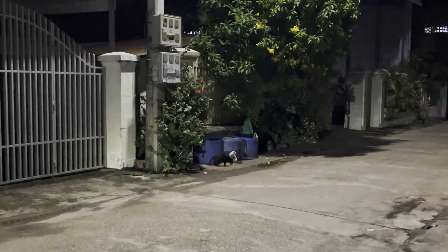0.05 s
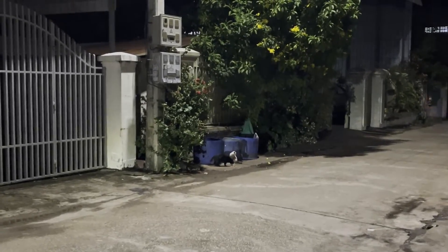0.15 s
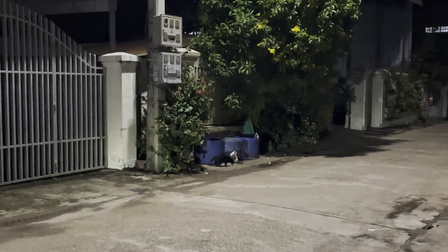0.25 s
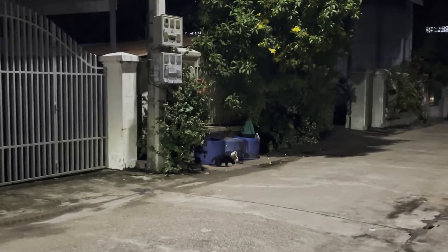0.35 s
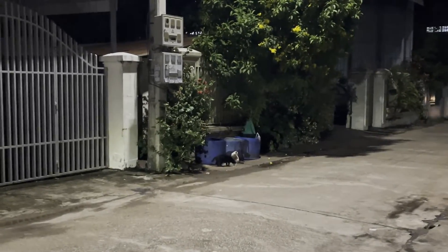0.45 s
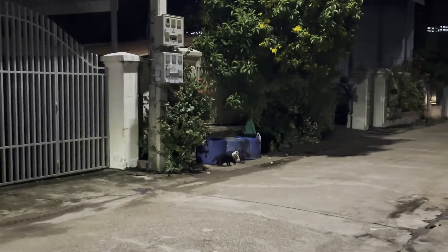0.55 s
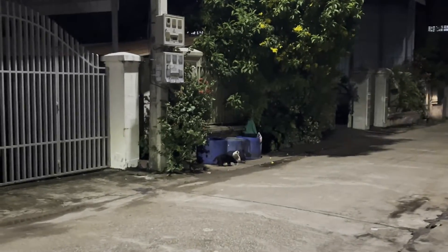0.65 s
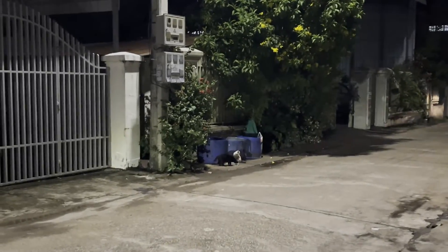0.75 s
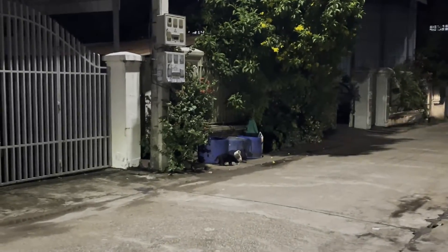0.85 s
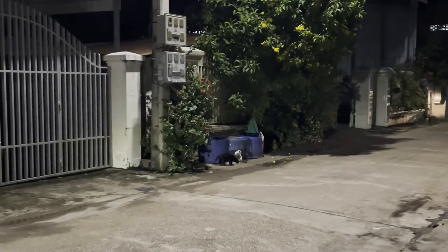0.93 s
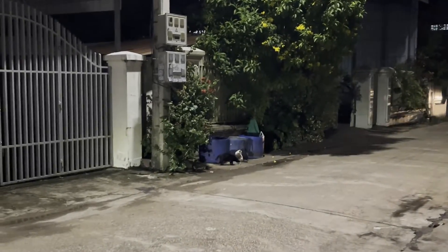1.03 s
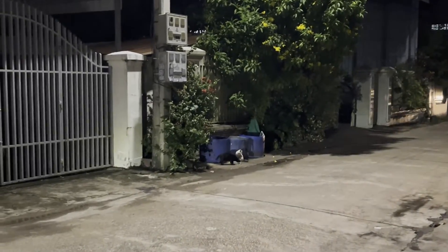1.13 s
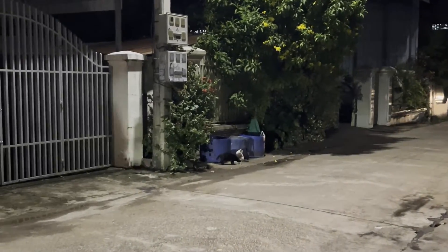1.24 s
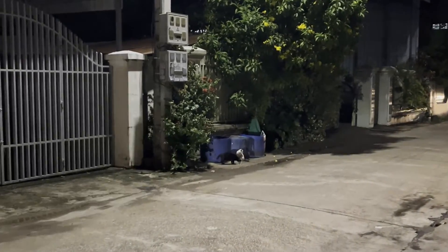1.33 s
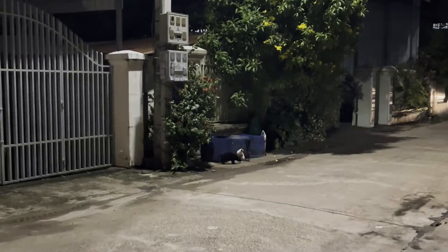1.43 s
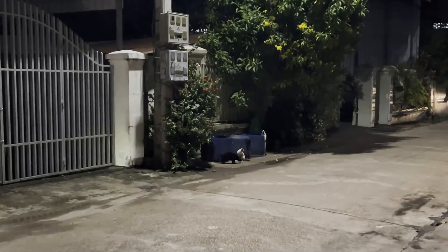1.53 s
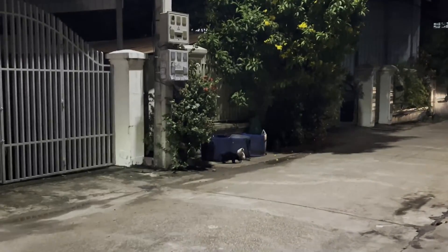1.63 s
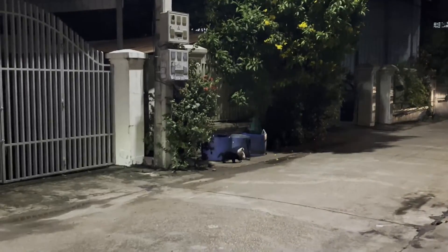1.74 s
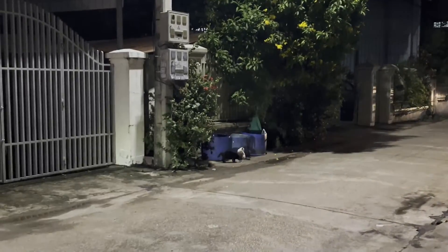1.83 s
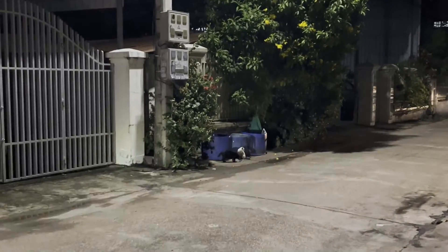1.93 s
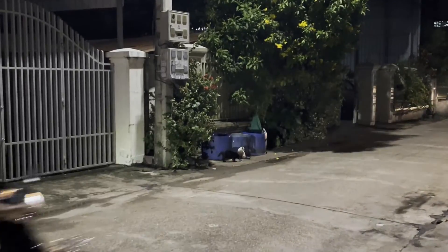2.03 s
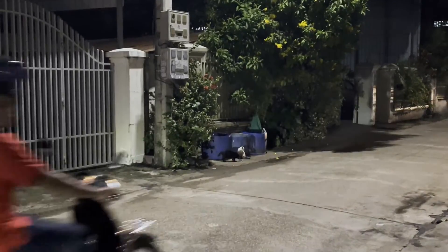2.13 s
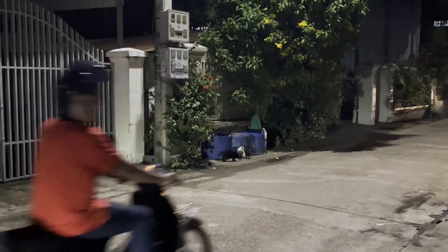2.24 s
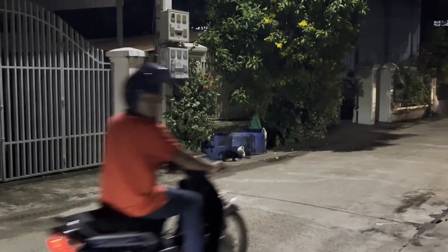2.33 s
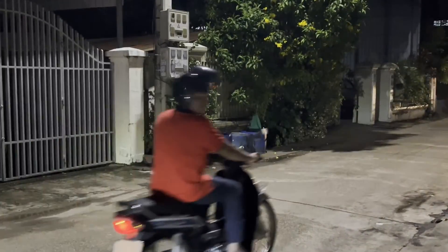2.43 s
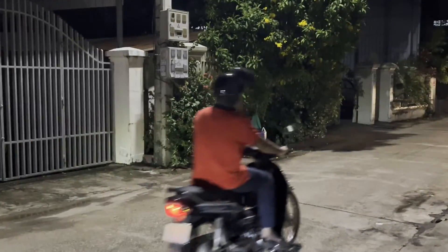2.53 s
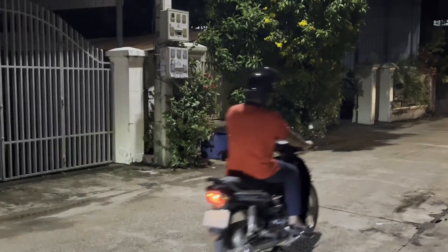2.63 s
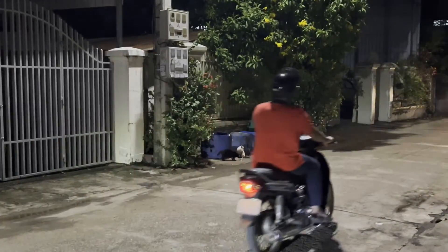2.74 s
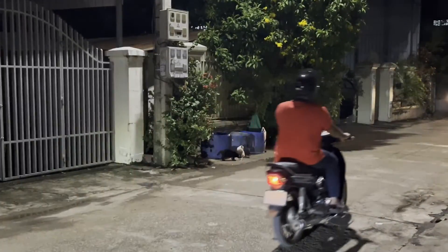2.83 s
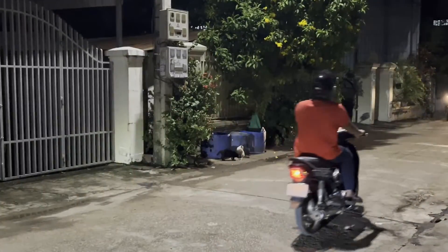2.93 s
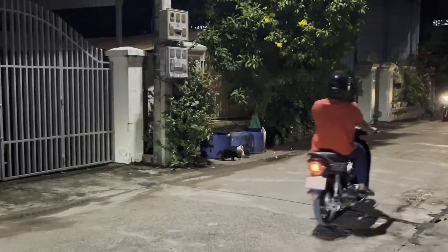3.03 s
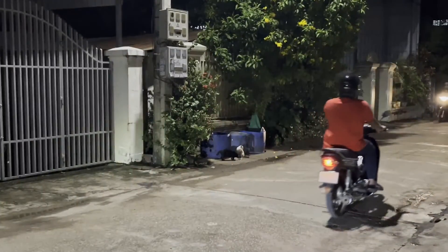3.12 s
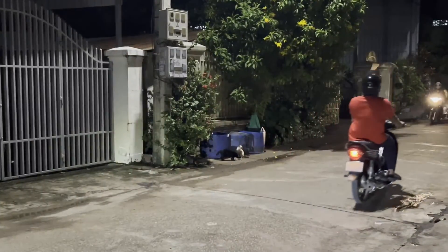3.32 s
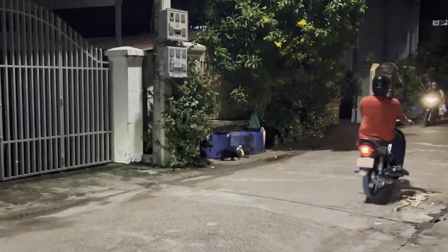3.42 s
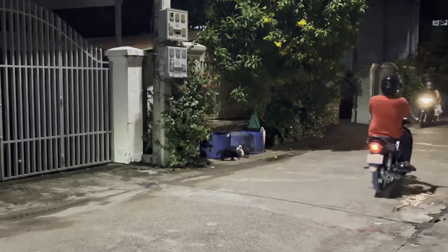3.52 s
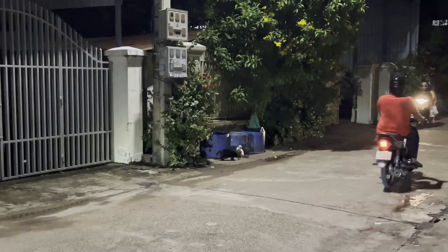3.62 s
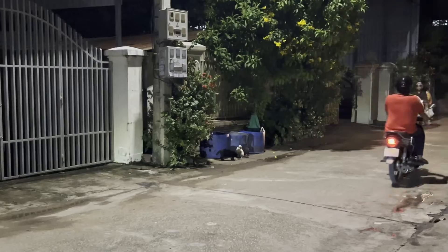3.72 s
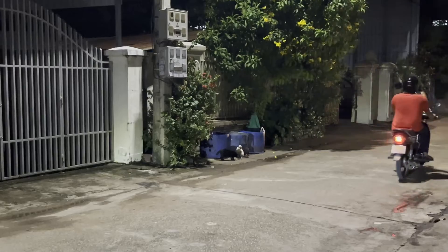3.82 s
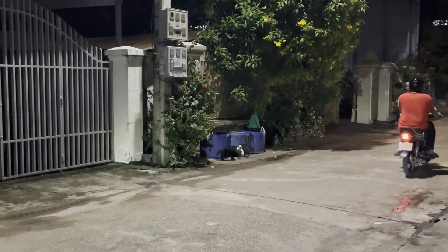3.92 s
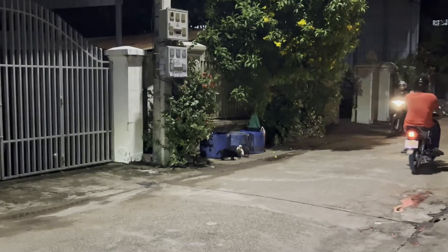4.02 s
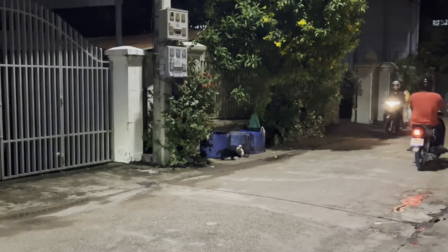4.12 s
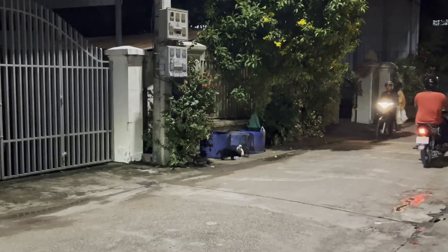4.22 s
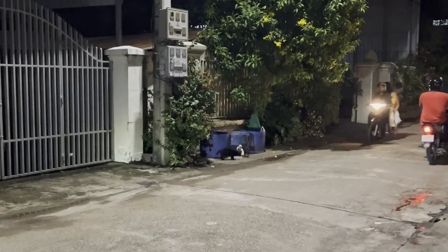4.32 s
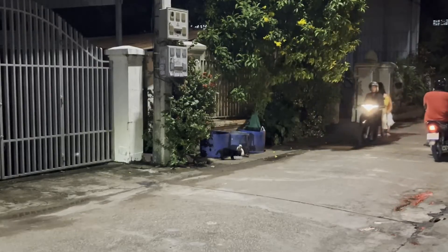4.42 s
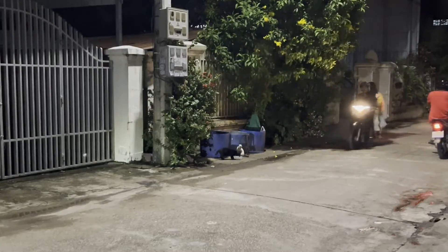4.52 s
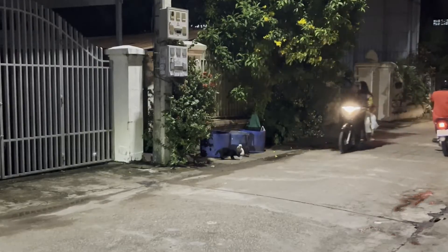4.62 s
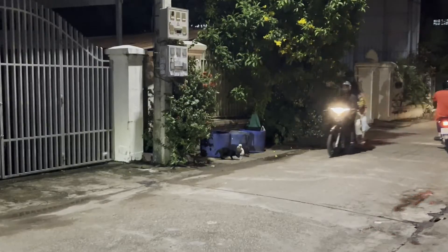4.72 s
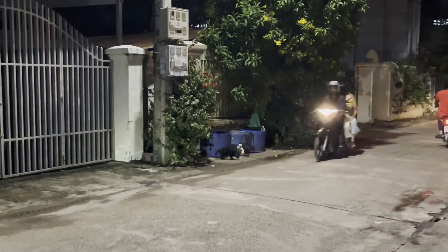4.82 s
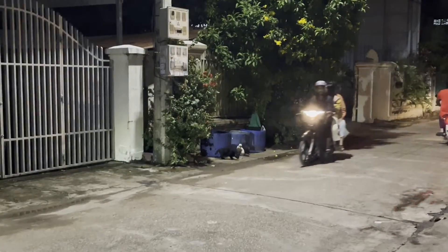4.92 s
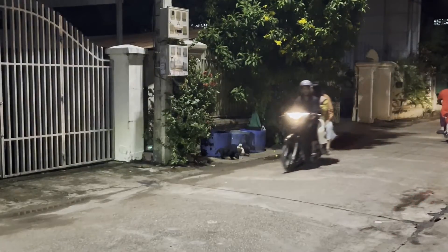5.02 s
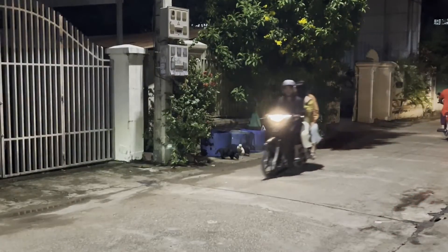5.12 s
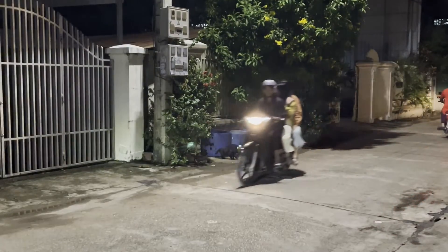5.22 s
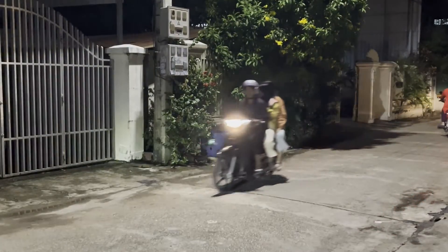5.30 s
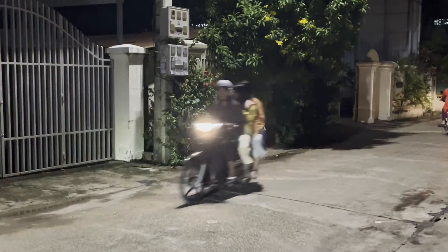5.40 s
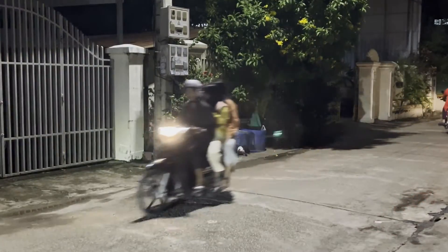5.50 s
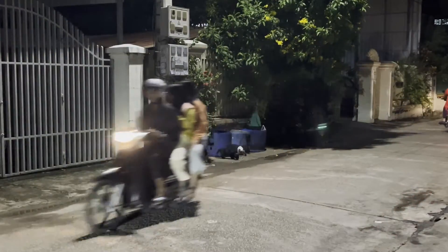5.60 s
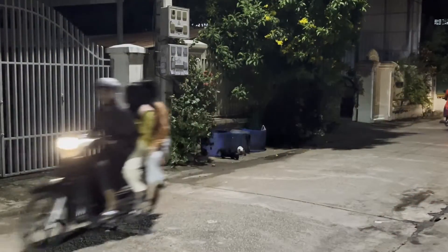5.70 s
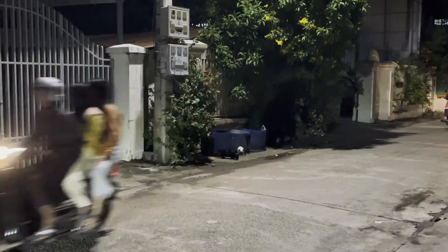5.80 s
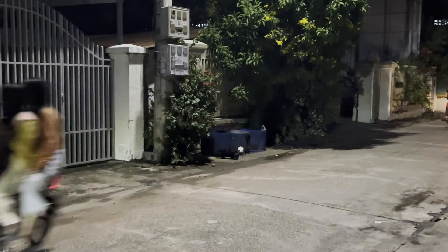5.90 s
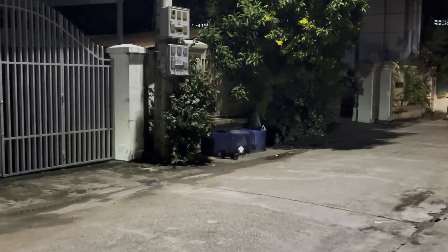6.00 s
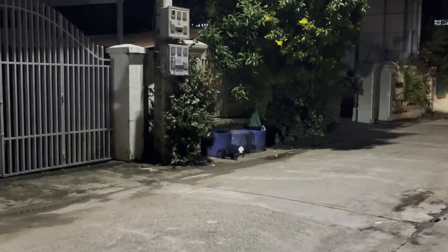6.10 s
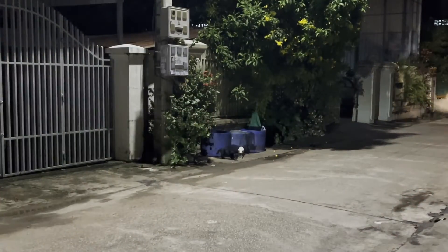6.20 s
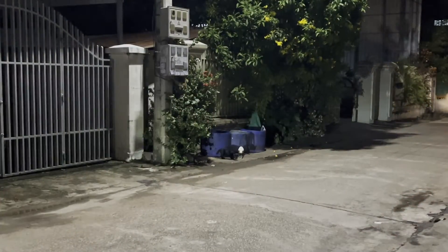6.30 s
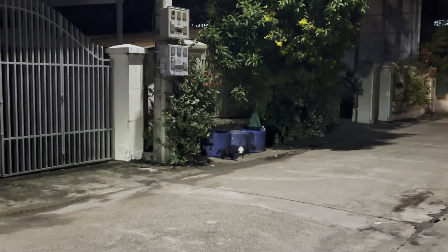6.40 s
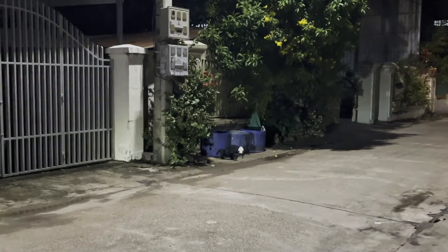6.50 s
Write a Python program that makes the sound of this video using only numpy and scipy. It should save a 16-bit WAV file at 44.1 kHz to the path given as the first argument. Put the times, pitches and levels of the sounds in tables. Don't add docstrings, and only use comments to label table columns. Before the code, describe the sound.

In a quiet walled lane at night, one small motorbike putters past and accelerates off, then another approaches and passes with rattling metal.

```python
import sys
import numpy as np
from scipy import signal
from scipy.fft import rfft, irfft, next_fast_len
from scipy.io import wavfile
from scipy.ndimage import uniform_filter1d

SR = 44100
rng = np.random.default_rng(int(sys.argv[2]) if len(sys.argv) > 2 else 0)


def file_out(sig):
    cols = np.atleast_2d(sig).T
    lim = np.clip(cols, -1, 1)
    pcm = np.round(lim * 32767).astype(np.int16)
    wavfile.write(sys.argv[1], SR, pcm)


def voltage_ratio(decibels):
    exponent = np.asarray(decibels, float) / 20
    return 10 ** exponent


N = 288855
T = np.arange(N) / SR
FAST = next_fast_len(N)
HZ = np.maximum(np.fft.rfftfreq(FAST, 1 / SR), 1)

# t/s, f/Hz
FIRING_RATE_1 = [(0, 21.88), (0.3, 21.42), (0.6, 20.25), (0.9, 18.49), (1.5, 16.19), (2.1, 13.54),
                 (2.7, 12.19), (3, 11.53), (3.3, 10.48), (3.55, 9.14), (3.7, 13.05), (3.85, 16.72),
                 (4, 16.12), (4.15, 17.5), (4.3, 19.56), (4.5, 20.55), (4.85, 21.1), (5, 21.2),
                 (5.34, 21.1)]
FIRING_RATE_2 = [(0, 20.3), (1.5, 20.5), (2.5, 20.9), (3.3, 20.6), (4, 20.9), (4.9, 20.7), (5.5, 20.8),
                 (5.8, 21), (6.1, 20.75), (6.3, 20.45), (6.55, 20.05)]
FIRING_1_S, FIRING_2_S = 2.277, 6.191
# t/s, thump level/dB, throttle/1, wall echo level/dB
EXHAUST_1 = [(0, -57.5, 0.16, 1.5), (.45, -52.5, 0.29, -4.5), (.85, -55.5, 0.03, -8.5),
             (1.05, -50, 0.18, -7.5), (1.12, -57.5, 0.11, -5), (1.18, -52, 0.14, -5),
             (1.29, -48.5, 0.2, -12), (1.4, -52.5, 0.25, -6), (1.498, -48, 0.19, -7.5),
             (1.58, -48.5, 0.2, -6), (1.65, -52.5, 0.08, -7), (1.715, -43.5, 0.26, -8),
             (1.79, -47.5, 0.25, -7.5), (1.86, -48.5, 0.35, 2.5), (1.923, -43.5, 0.33, -12),
             (2.05, -51, 0, 0), (2.14, -42.5, 0.28, -13), (2.35, -39, 0.1, -6.5), (2.52, -43.5, .2, -10),
             (2.6, -43, 0.24, -3), (2.68, -44, 0.26, 1), (2.77, -42, 0.35, -3.5), (2.92, -50.5, 0.5, 2),
             (3.02, -48, 0.52, -2), (3.11, -44, 0.47, -3.5), (3.2, -43, 0.57, -5), (3.3, -48.5, 0.29, -4),
             (3.39, -46, 0.44, -1.5), (3.5, -56, 0.46, -5), (3.7, -44, 0.37, -7.5), (4.031, -48, 0.41, -2),
             (4.18, -36, 0.75, -11), (4.24, -45, 0.72, -3.5), (4.4, -41.5, 0.74, -14.5),
             (4.6, -46.5, 0.75, -3.5), (4.8, -52, 0.99, 5), (5, -41.5, 0.78, -0.5),
             (5.17, -43.5, 0.77, -2.5), (5.35, -43, 0.96, 0), (5.9, -72, 0.3, -3)]
EXHAUST_2 = [(0, -56, 0.38, -5), (1.5, -65, 0.98, -9), (2.5, -57, 0.46, 1), (3.7, -51.5, 0.47, 5.5),
             (4.3, -56, 0.41, 7), (4.7, -50, 0.63, 11.5), (4.978, -48, 0.55, -7), (5.2, -48, 0.56, -13),
             (5.36, -49, 0.48, 4.5), (5.43, -37.5, 0.9, -6.5), (5.48, -35, 1, -3), (5.6, -36, 1, -7),
             (5.75, -35, 0.74, -4), (5.9, -38, 0.43, -2), (6.051, -38.5, 0.59, 2), (6.2, -35, 0.66, -8),
             (6.3, -34, 0.49, -13), (6.4, -33, 0.53, -30), (6.55, -35, 0.83, 2)]
# f/Hz, width/Hz
PIPE_1 = [
    (87.7, 48),
    (57.3, 30.4),
    (178.8, 72.7),
    (232, 90),
    (112.15, 54.2),
]
PIPE_2 = [
    (84.7, 28),
    (43, 8.2),
    (155.4, 74),
    (250.6, 103),
    (113.24, 41),
]
# delay/s (replaced by the nearest-wall delay in row one), level/dB, drift/s, extra lag on the right/s
WALLS_1 = [(0, -1.5, 0.00024, .00015), (.024, -3.5, 0.0016, -.0002), (0.036, -6, 0.006, .0003),
           (0.051, -13, 0.0026, -.0004), (0.08, -10.5, 0.013, .0004)]
WALLS_2 = [(0, -1.5, 0.00021, .00015), (0.017, -5.5, 0.002, -.0002), (0.031, -4.5, 0.0027, .0003),
           (.052, -18.5, 0.0047, -.0004), (0.082, -17.5, 0.0046, .0004)]
# t/s, delay/ms
NEAR_WALL_1 = [(0, 7), (.4, 9.6), (.8, 9.2), (1.2, 7.3), (1.6, 9.4), (2, 8.1), (2.4, 8.4), (2.8, 12.5),
               (3.2, 8.74), (3.6, 10.4), (4, 8.3), (4.3, 12.3), (4.54, 13.4), (4.8, 11.24), (5, 9.07),
               (5.17, 13.9), (5.39, 12.2)]
NEAR_WALL_2 = [(0, 12), (3, 8.55), (4, 10.3), (5, 10.6), (5.39, 10.6), (5.52, 9.4), (5.7, 11.2),
               (5.86, 11.6), (6.06, 8.2), (6.2, 10.6), (6.31, 13), (6.4, 5.9), (6.55, 8.5)]
# (level/dB at closed throttle, dB added at full throttle); loaded share likewise/1
BOOM_1, BARK_1, UPPER_1, LOADED_1 = (13, -38), (-12.5, 8.8), (-22, 9.3), (0.17, 0.7)
BOOM_2, BARK_2, UPPER_2, LOADED_2 = (3, -34), (-2, -13), (-8.5, -12), (0.23, 0.73)
# t/s, share/1
FRONT_1 = [(0, 0.076), (.8, 0.28), (1.6, 0.52), (2.78, 0.67), (2.9, 0.016), (3.5, -0.21), (4.2, -0.23),
           (4.45, 0.01)]
FRONT_BOOM_DB, FRONT_BARK_DB, FRONT_ECHO_DB = 4.5, 11.5, -7.5
# t/s, shift/ms
PUFF_SHIFT_1 = [(0, 3.5), (2.78, 4), (2.84, -5), (2.92, 4.5), (3.09, 0.5), (3.19, -4.5), (3.28, -3.5),
                (3.58, -5), (3.75, -4), (3.81, 3), (4, 3), (4.18, -3), (4.45, -2.5), (4.53, 3.5)]
LOPE_DB, LOPE_HZ, LOPE_WIDTH_HZ, WEAK_LATE_S = 6.5, 12.8, 0.95, 0.0032
FULL_DB, FULL_BOOM_DB = 3, -3.5

# t/s, r/m
DISTANCE_1 = [(0, 21), (.37, 12), (.6, 6.8), (1.07, 5.75), (1.54, 3.7), (1.9, 2.3), (2.1, 1.48),
              (2.32, 2.13), (2.55, 2.86), (2.95, 3.76), (3.4, 9.2), (4.5, 35), (6.55, 9.5)]
DISTANCE_2 = [(0, 36), (3, 7), (3.6, 12.6), (4.18, 9.7), (4.44, 7.1), (4.83, 6.1), (5.27, 5.04),
              (5.55, 3.66), (5.9, 2.2), (6.15, 2.28), (6.35, 2.45), (6.55, 2.84)]
REFERENCE_M = 2.5
ROLL_HZ = [600, 2000, 5200, 11500]
# level/dB at the reference distance, and steepness of the fade with distance/1
ROLL_1, ROLL_FADE_1 = [-57, -58, -72.5, -75], [0.6, 0.75, 0.77, 1.422]
ROLL_2, ROLL_FADE_2 = [-53.5, -52.5, -62.5, -69], [0.7, 1.047, 0.79, 1.15]
# from t/s, to t/s, change/dB
SHADE_1, SHADE_2 = (1.92, 2.1, -5), (6, 5.85, -1.4)
# f/Hz, level per Hz/dB
HISS_1 = [(150, 3.5), (230, 8), (300, -8), (400, 3), (560, 2), (800, 1.5), (1200, -2), (1500, 2.5),
          (1900, -1), (2600, -4.5), (3300, -6), (3700, -11.5), (7000, -9), (14500, -4)]
HISS_2 = [(150, 11.5), (300, 1), (450, 1), (660, -2.5), (850, 2), (1200, 0), (1500, 2), (2250, -3.5),
          (2650, -5.5), (3300, -9.5), (3700, -17.5), (5800, -16.5), (7000, -12.5), (14500, -10.5)]
# f/Hz, width/Hz, level/dB
CASE_1 = [(560, 99, 1), (1800, 260, 2.5), (302, 46, 4)]
CASE_2 = [(693, 74, 10), (1710, 1700, 0.87), (5640, 520, 4.4)]

# t/s, level/dB, ring f/Hz, t60/s, crack level/dB
RATTLES = [(.617, -41, 887, 0.058, -60), (1.636, -68, 3000, 0.042, -69), (1.928, -39, 2750, 0.034, -49),
           (1.932, -56, 4750, .05, -70), (2.014, -50, 4840, 0.05, -55.5), (2.053, -43, 4510, 0.045, -52.5),
           (2.186, -63, 13100, 0.024, -69), (2.276, -45.5, 2626, 0.073, -54),
           (2.383, -49.5, 4380, 0.077, -54.5), (2.39, -55, 6140, 0.053, -69),
           (2.419, -50, 4130, 0.087, -55.5), (2.426, -49.5, 6120, 0.089, -63),
           (2.6, -61, 5200, 0.021, -59.5), (2.76, -65.5, 4970, 0.043, -59), (2.947, -51, 5360, 0.025, -65),
           (4.703, -61, 3940, 0.033, -61), (5.675, -37, 1010, 0.066, -46.5), (5.894, -41, 1730, 0.092, -70),
           (5.95, -19, 647, 0.055, -69), (6.155, -41.5, 2010, 0.073, -70), (6.203, -47.5, 1990, 0.18, -66),
           (6.439, -45.5, 1820, 0.14, -72), (.655, -55, 870, 0.11, -70), (2.022, -48, 4770, 0.04, -62),
           (2.05, -54, 10500, .04, -73), (2.376, -55, 10600, 0.039, -66), (2.415, -51, 3250, 0.073, -64),
           (5.95, -42.5, 1745, 0.26, -70), (6.13, -38, 686, .08, -70), (6.243, -42, 1990, 0.098, -68),
           (6.31, -35, 650, 0.079, -66), (6.445, -39, 1440, 0.16, -75), (5.865, -36.5, 591, 0.13, -68),
           (6.33, -43, 393, 0.28, -72), (6.44, -37, 560, 0.097, -70), (6.465, -41.5, 470, 0.18, -67),
           (6.49, -41, 606, 0.11, -65), (6.245, -51, 3440, 0.092, -72), (5.675, -42, 687, 0.056, -68),
           (6.275, -60, 1800, 0.07, -72)]
RING_SAG, RING_CLEAN = 0.636, 0.7
# t/s, level/dB
TICKS = [(1.158, -69), (1.389, -73), (1.453, -66), (1.516, -64), (1.581, -65), (1.635, -64), (1.707, -55),
         (1.774, -58), (1.8266, -62), (1.845, -59), (1.884, -63), (1.908, -55), (1.982, -55), (2.053, -58),
         (2.129, -54), (2.1858, -56), (2.209, -60), (2.2786, -56), (2.379, -63), (2.428, -59), (2.482, -57),
         (2.5151, -66), (2.59, -61), (2.757, -64), (2.878, -65), (3.771, -66), (3.1115, -60), (5.921, -57),
         (6.234, -52)]
# t/s, level/dB, attack/s, delay of the second snap/s, its relative level/dB
CLACKS = [
    (3.107, -49.5, 0.0048, 0.019, 0),
    (3.637, -58, 0.003, .008, -4),
]
# f/Hz, level/dB
CLACK_COLOUR = [(500, 5), (1300, 7.5), (2500, 1), (4000, 0), (5500, 3), (7500, 0), (10000, -9.5),
                (14000, -14), (15000, -24)]
# f/Hz, level/dB
CLACK_MODES = [
    [(1780, -13), (2550, 5.5), (3850, -9), (5330, -7), (6800, -14), (10100, 1.5)],
    [(3030, 7), (3910, -7), (4610, 9.5), (5940, 4), (6600, -1), (10100, -3)],
]

# f/Hz, level per Hz/dB
NIGHT = [(120, -57), (200, -47), (302, -4.5), (432, -30.5), (1040, -24), (1160, -29), (2420, -35.5),
         (14500, -47.5)]
NIGHT_DB, NIGHT_FADE_DB, NIGHT_FADES_S = -65, -8, (0.36, 0.92)

# t/s, left minus right level/dB
PAN = [(0, 1.6), (1.2, 2.4), (2, 0.5), (2.7, 1.5), (3.7, 1.9), (4.7, 2), (5.2, 1.7), (5.7, 1), (6.3, 1.2)]
# f/Hz, likeness/1
LIKENESS = [(150, 0.96), (300, 0.55), (550, 0.84), (900, 0.3), (1250, 0.43), (1500, 0.67), (2000, 0.91),
            (4000, 1), (8500, .97), (14500, 0.71)]
# f/Hz, left minus right level/dB
BALANCE_DB = [(60, -1.36), (200, -1), (300, -2), (500, 3.5), (700, 1.5), (1000, 1), (1500, -6),
              (2000, -4.5), (2500, -2), (3200, 0), (15000, 0)]
# f/Hz, lead of the left/rad
LEAD = [(0, 0), (1100, .1), (1500, 3), (1650, 3), (1720, .3), (3200, .5), (4500, 0), (6000, -.95),
        (7000, -1.5), (8500, -3.14), (9500, -4.25), (12000, -6.28), (13500, -7.6), (15500, -9.7)]
# f/Hz, level/dB
PORT = [(7000, 0), (9300, 2), (10200, 4), (11000, -3), (14000, -4.5), (14800, -1), (15300, -15)]


def curves(rows):
    s, *columns = np.transpose(rows)
    return [np.interp(T, s, c) for c in columns]


def on_hz(rows):
    hz, value = np.transpose(rows)
    return np.interp(np.log(HZ), np.log(hz), value)


def unit(x):
    return x / np.sqrt(np.mean(x ** 2))


def ring(x, hz, width):
    return signal.lfilter(*signal.iirpeak(hz, hz / width, SR), x)


def walk(rate):
    k = int(SR / rate)
    held = np.repeat(rng.standard_normal(N // k + 1), k)
    return 1.241 * uniform_filter1d(uniform_filter1d(held, k), k)[:N]


def diffuse_noise(gain):
    like = np.clip(on_hz(LIKENESS), 0, 1)
    same, other = rfft(rng.standard_normal((2, N)), FAST) * gain
    pair = np.sqrt(1 + like) * same + np.sqrt(1 - like) * other * np.array([[1], [-1]])
    return pair, same


def lane(x, t60_s, db):
    t = T[:SR // 2]
    same, other = rng.standard_normal((2, len(t))) * voltage_ratio(-60 * t / t60_s)
    tail = np.array([same + 0.16 * other, same - 0.27 * other])
    tail = tail / np.sqrt(np.sum(same ** 2))
    return x + voltage_ratio(db) * signal.fftconvolve(x[None], tail, axes=1)[:, :N]


def cycles(revs, known_s):
    count = np.cumsum(curves(revs)[0]) / SR
    return count - np.interp(known_s, T, count)


def exhaust(count, rows, pipe, walls, near_wall, boom_rule, bark_rule, upper_rule, loaded_rule,
            front, lead_s, polarity, jitter_s, scatter_db):
    thump_db, throttle, echo_db = curves(rows)
    boom_db, bark_db, upper_db = (thump_db + shut + opened * throttle
                                  for shut, opened in (boom_rule, bark_rule, upper_rule))
    boom_db = boom_db + FRONT_BOOM_DB * front
    bark_db = bark_db + FRONT_BARK_DB * front
    echo_db = echo_db + FRONT_ECHO_DB * front

    number = np.arange(np.ceil(count[0]), count[-1])
    time_chance, size_chance = rng.standard_normal((len(number), 2)).T
    when = np.interp(number, count, T - lead_s) + jitter_s * time_chance
    near_idle = np.exp(-((np.gradient(count) * SR - LOPE_HZ) / LOPE_WIDTH_HZ) ** 4)
    lope = np.interp(when, T, near_idle * np.clip(2 * front, 0, 1))
    weak, full = lope * (number % 2), lope * (1 - number % 2)
    when = when + WEAK_LATE_S * weak
    size = voltage_ratio(scatter_db * size_chance - LOPE_DB * weak)

    puffs = np.zeros((3, N))
    direct = np.clip((when * SR).astype(int), 0, N - 1)
    puffs[:2, direct] = size * (1 - full)
    puffs[2, direct] = size * full
    nearest = np.interp(when, *np.transpose(near_wall)) / 1000
    for k, (delay, db, drift, lag) in enumerate(walls):
        late = when + (delay if k else nearest) + drift * np.interp(when, T, walk(0.716))
        echo = size * voltage_ratio(db + np.interp(when, T, echo_db))
        for side in range(2):
            at = np.clip(((late + side * lag) * SR).astype(int), 0, N - 1)
            np.add.at(puffs[side], at, echo)

    modes = []
    for hz, width in pipe:
        rung = ring(ring(ring(puffs, hz, width), hz, 1.02 * width), hz, 1.39 * width)
        modes.append(rung / np.sqrt(np.mean(rung[:2] ** 2)))
    idle, boom, bark, upper, loaded = modes
    share = np.clip(loaded_rule[0] + loaded_rule[1] * throttle + front, 0, 1)
    thump = (1 - share) * idle[:2] + share * loaded[:2]
    thump = thump + voltage_ratio(FULL_DB) * idle[2] - voltage_ratio(FULL_BOOM_DB) * boom[2]
    deep = voltage_ratio(thump_db + 4.5) * thump - voltage_ratio(boom_db) * boom[:2]
    return polarity * (deep + voltage_ratio(upper_db) * upper[:2]) - voltage_ratio(bark_db) * bark[:2]


def loss(distance):
    return 20 * np.log10(np.maximum(curves(distance)[0], 1) / REFERENCE_M)


def rolling(count, loss_db, near_db, steepness, colour, case, fade, shade, tick_db, puff_db, flicker_db):
    levels = np.array(near_db)[:, None] - np.outer(steepness, loss_db)
    levels[:2] += np.interp(T, shade[:2], (0, shade[2])) * np.array([[.4], [1]])
    case_db = sum(db / (1 + (2 * (HZ - hz) / width) ** 2) for hz, width, db in case)
    pair, same = diffuse_noise(voltage_ratio(on_hz(colour) + case_db))

    phase, swell, out = count % 1, walk(4.3), 0
    puff = np.exp(-((phase - .2) / 0.047) ** 2)
    carry_db = .8 * (levels[3] - levels[3].max())
    tick = np.exp(-phase / 0.08) * voltage_ratio(2.5 * walk(12) + carry_db)

    edges = [350, 1100, 3500, 8500, 15000]  # Hz, limits of the four ranges
    scale = [np.sqrt(2 * np.sum(np.abs(same[(HZ > a) & (HZ < b)]) ** 2) * 2) / N
             for a, b in zip(edges, edges[1:])]
    levels = levels - 20 * np.log10(scale)[:, None]
    for k in range(-7, 14):
        hz = 700 * 2 ** (k / 3)
        mask = np.cos(np.pi / 2 * np.clip(3 * np.log2(HZ / hz), -1, 1))
        place = np.interp(np.log(hz), np.log(ROLL_HZ), np.arange(4))
        low = min(int(place), 2)
        db = levels[low] + (place - low) * (levels[low + 1] - levels[low])
        beat = 1 + voltage_ratio(puff_db) * puff + voltage_ratio(tick_db) * tick * min(hz / 10000, 1) ** 2
        band = irfft(pair * mask, FAST)[:, :N]
        out = out + band * voltage_ratio(db + 0.5 * swell + flicker_db * walk(9)) * beat
    return out * fade


def rattles():
    out, t = np.zeros(N), T[:SR // 4]
    for s, db, hz, t60, crack_db in RATTLES:
        noise = rng.standard_normal((2, len(t))) * np.minimum(t / 0.00055, 1)
        tone = np.sin(2 * np.pi * hz * t * (1 - RING_SAG * t))
        shake = RING_CLEAN * tone + 0.42 * unit(ring(noise[0], hz, 0.018 * hz))
        shake = shake * np.minimum(t * hz / 12, 1) * voltage_ratio(db - 60 * t / t60)
        crack = unit(ring(noise[1], 0.48 * hz, 0.55 * hz)) * voltage_ratio(crack_db - 60 * t / 0.11)
        piece = out[int(s * SR):int(s * SR) + len(t)]
        piece += (shake + crack)[:len(piece)]
    return lane(out, 0.33, -9.0)


def ticks():
    out, t = np.zeros(N), T[:SR // 50]
    for s, db in TICKS:
        tick = unit(ring(rng.standard_normal(len(t)), 12200, 3000))
        out[int(s * SR):int(s * SR) + len(t)] += tick * voltage_ratio(db - 60 * t / 0.021)
    return lane(out, 0.084, -12)


def clacks():
    out = np.zeros(N)
    for (s, db, attack, delay, second_db), modes in zip(CLACKS, CLACK_MODES):
        for start, gain_db in ((s, db), (s + delay, db + second_db)):
            t = np.maximum(T - start, 0)
            grit = rng.standard_normal(N) * voltage_ratio(2.7 * walk(900))
            noise = unit(irfft(rfft(grit, FAST) * voltage_ratio(on_hz(CLACK_COLOUR)), FAST)[:N])
            noise = noise + 1.2 * sum(voltage_ratio(mode_db) * ring(noise, hz, 0.09 * hz) for hz, mode_db in modes)
            out += noise * np.minimum(t / attack, 1) * voltage_ratio(gain_db - 60 * t / 0.11)
    return lane(out, 0.35, -2.5)


def night():
    pair, _ = diffuse_noise(voltage_ratio(on_hz(NIGHT)) * (HZ > 200) * (HZ < 14800))
    fade_db = np.interp(T, NIGHT_FADES_S, (0, NIGHT_FADE_DB))
    return unit(irfft(pair, FAST)[:, :N]) * voltage_ratio(NIGHT_DB + fade_db + 1.0 * walk(2.92))


def scene():
    first, second = cycles(FIRING_RATE_1, FIRING_1_S), cycles(FIRING_RATE_2, FIRING_2_S)
    engines = exhaust(first, EXHAUST_1, PIPE_1, WALLS_1, NEAR_WALL_1, BOOM_1, BARK_1, UPPER_1, LOADED_1,
                      curves(FRONT_1)[0], curves(PUFF_SHIFT_1)[0] / 1000,
                      polarity=-0.97, jitter_s=0.00053, scatter_db=1.56)
    engines += exhaust(second, EXHAUST_2, PIPE_2, WALLS_2, NEAR_WALL_2, BOOM_2, BARK_2, UPPER_2, LOADED_2,
                       0, 0 * T, polarity=0.98, jitter_s=0.00036, scatter_db=1.3)
    pan_db = curves(PAN)[0] * np.array([[.5], [-.5]])

    swap = np.clip((T - 2.9) / 0.78, 0, 1)
    hiss = rolling(first, loss(DISTANCE_1), ROLL_1, ROLL_FADE_1, HISS_1, CASE_1, np.sqrt(1 - swap), SHADE_1,
                   tick_db=-3.0, puff_db=-6.5, flicker_db=1.53)
    hiss += rolling(second, loss(DISTANCE_2), ROLL_2, ROLL_FADE_2, HISS_2, CASE_2, np.sqrt(swap), SHADE_2,
                    tick_db=1.5, puff_db=-8.5, flicker_db=1.84)
    return engines * voltage_ratio(pan_db) + hiss + rattles() + ticks() + clacks() + night()


def low_pass(x):
    return signal.sosfilt(signal.butter(12, 15500, fs=SR, output="sos"), x)


def record(dry):
    hz, lead = np.transpose(LEAD)
    half = voltage_ratio(on_hz(BALANCE_DB) / 2) * np.exp(.5j * np.interp(HZ, hz, lead))
    channels = voltage_ratio(on_hz(PORT)) * np.array([half, 1 / half])
    x = irfft(rfft(dry, FAST) * channels, FAST)[:, :N]
    x = signal.sosfilt(signal.butter(4, 36, "high", fs=SR, output="sos"), x)
    return low_pass(x)


dry = scene()
out = record(dry)
file_out(out)
```